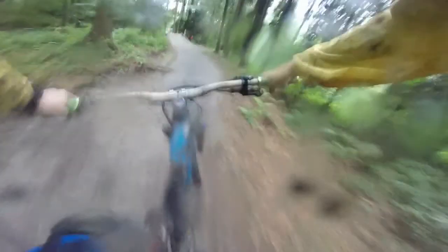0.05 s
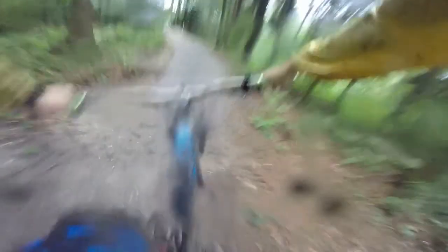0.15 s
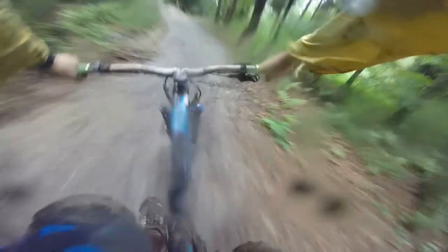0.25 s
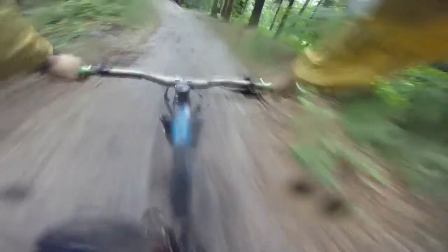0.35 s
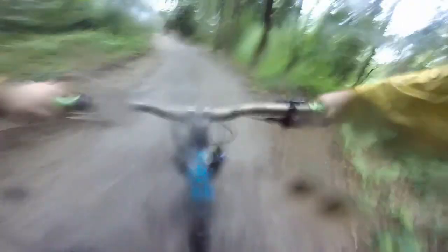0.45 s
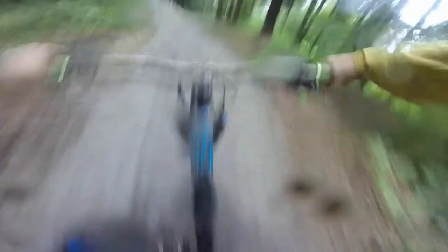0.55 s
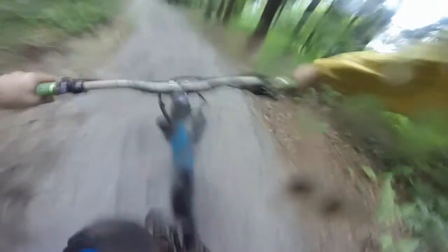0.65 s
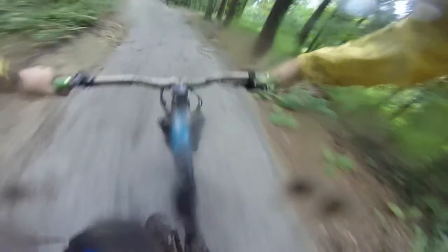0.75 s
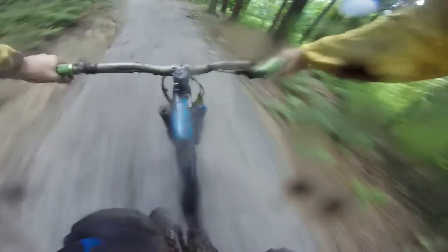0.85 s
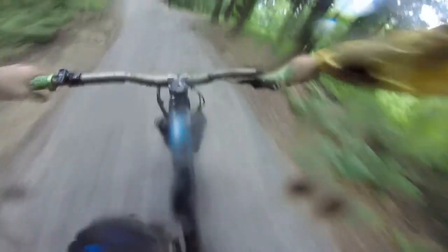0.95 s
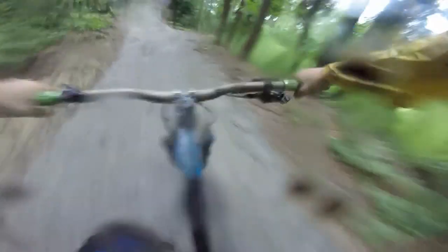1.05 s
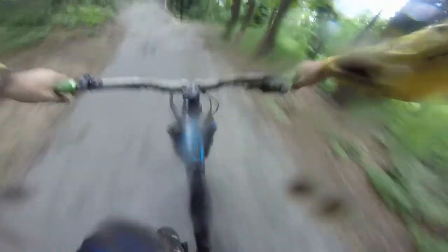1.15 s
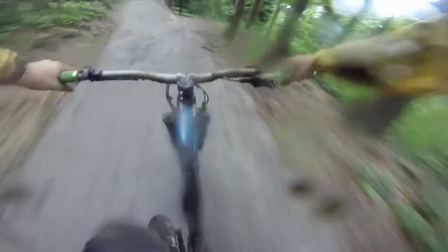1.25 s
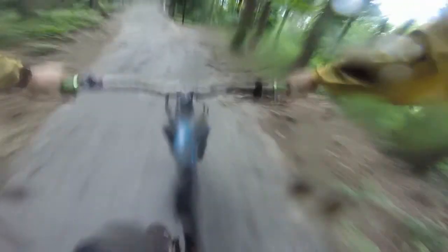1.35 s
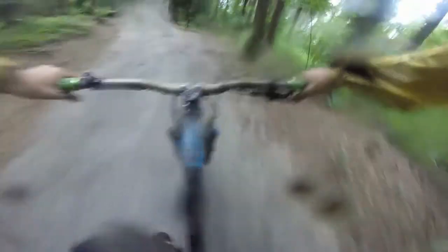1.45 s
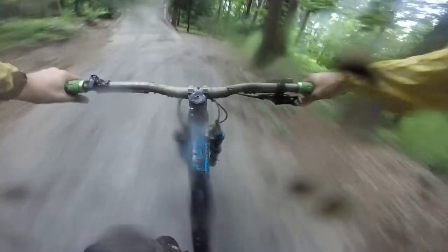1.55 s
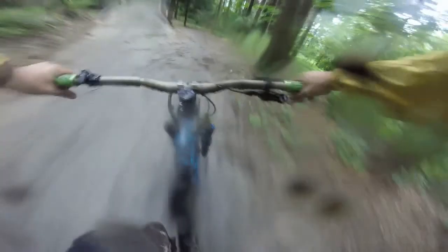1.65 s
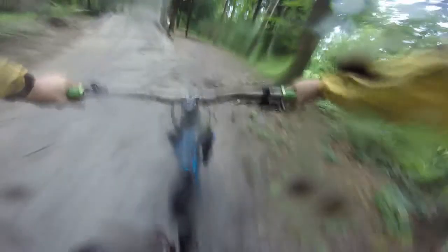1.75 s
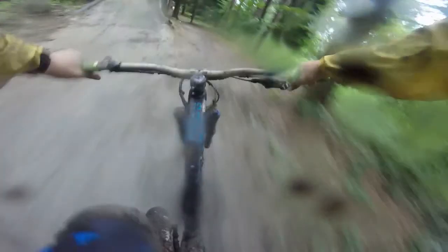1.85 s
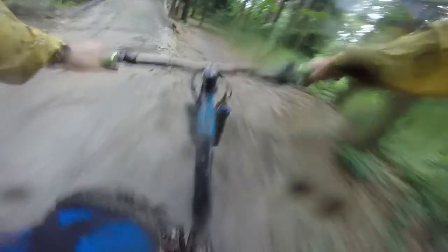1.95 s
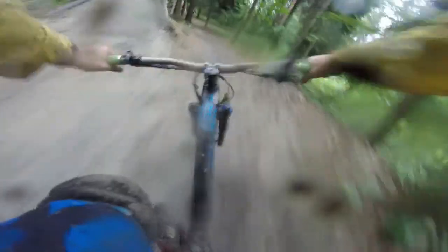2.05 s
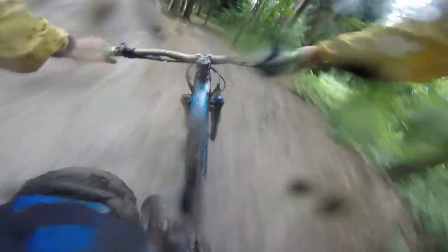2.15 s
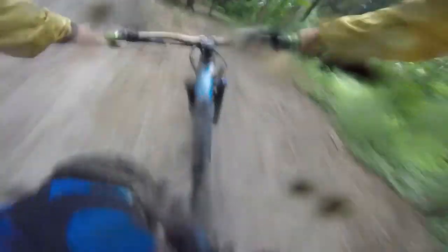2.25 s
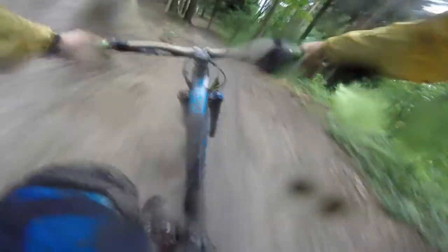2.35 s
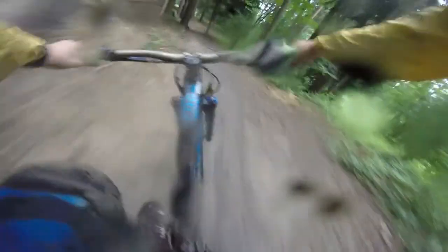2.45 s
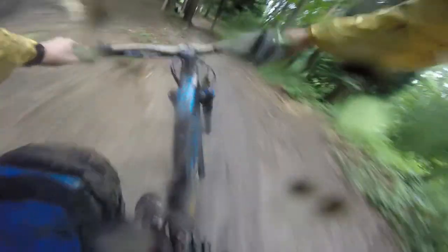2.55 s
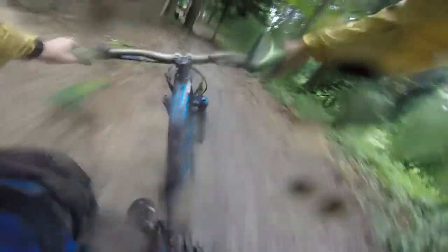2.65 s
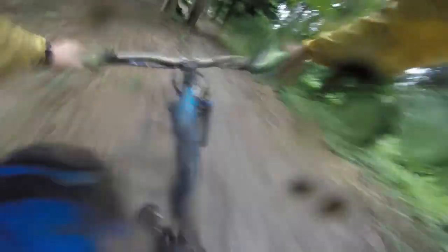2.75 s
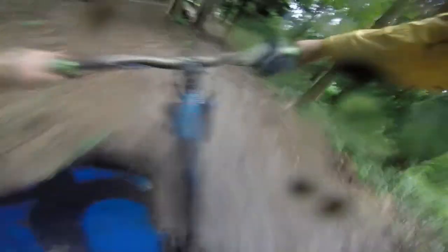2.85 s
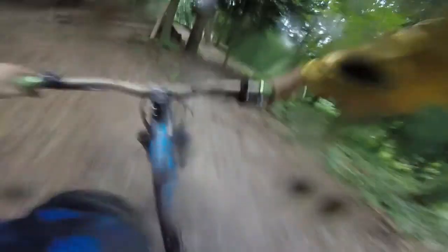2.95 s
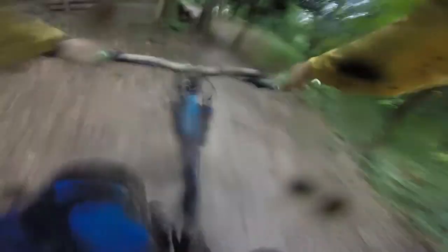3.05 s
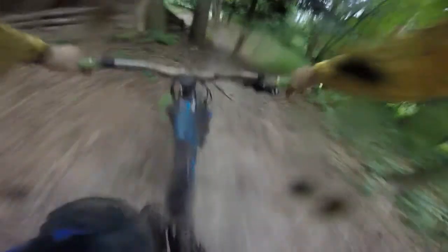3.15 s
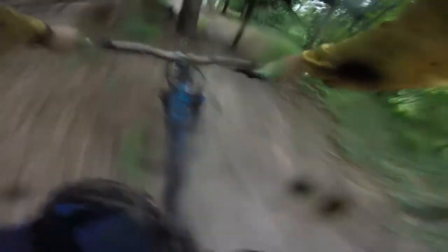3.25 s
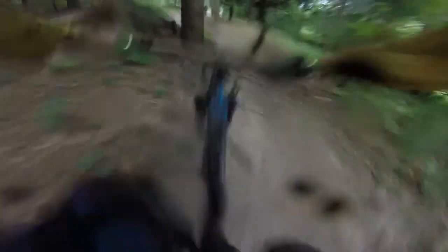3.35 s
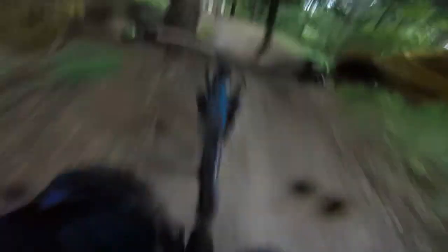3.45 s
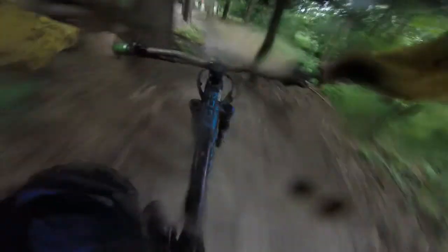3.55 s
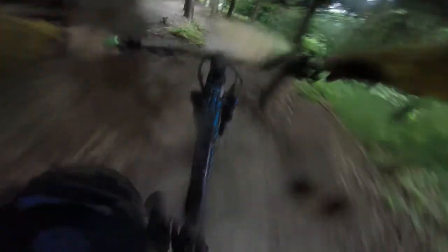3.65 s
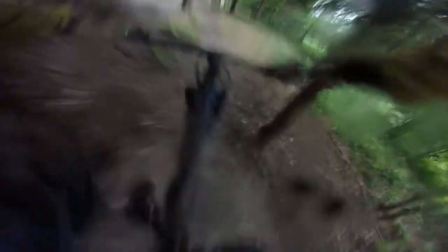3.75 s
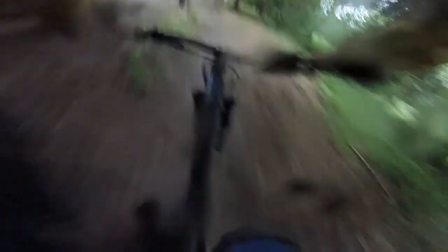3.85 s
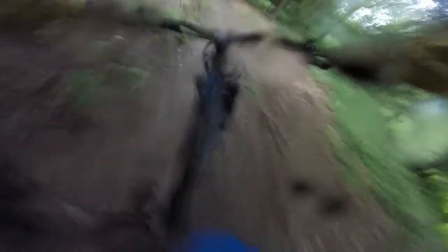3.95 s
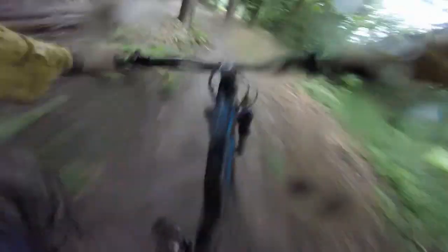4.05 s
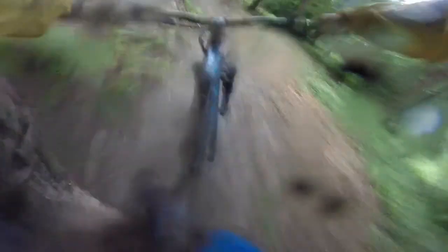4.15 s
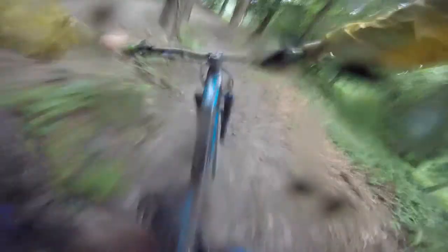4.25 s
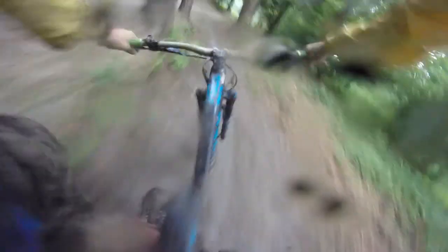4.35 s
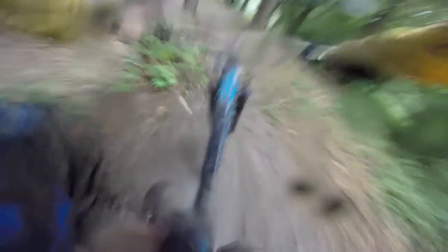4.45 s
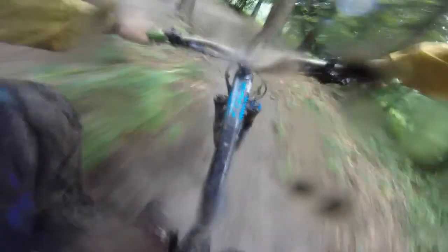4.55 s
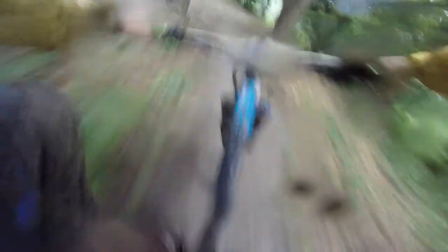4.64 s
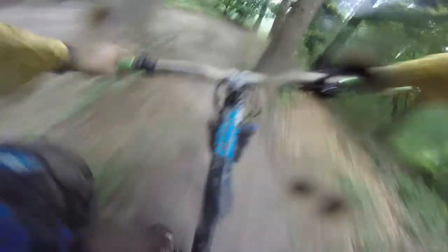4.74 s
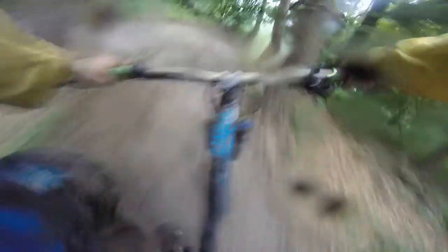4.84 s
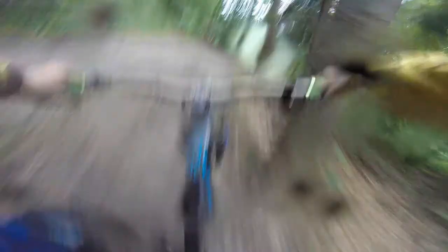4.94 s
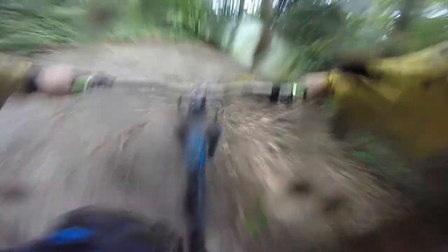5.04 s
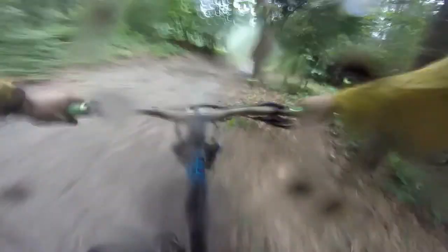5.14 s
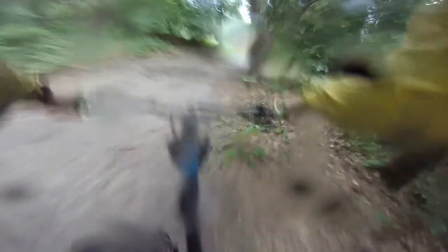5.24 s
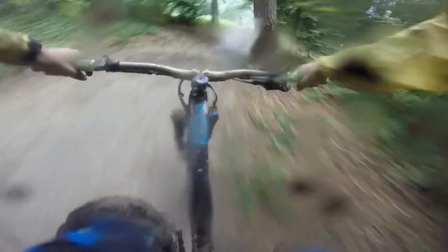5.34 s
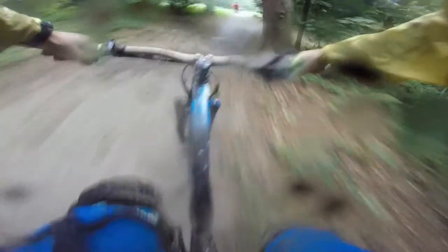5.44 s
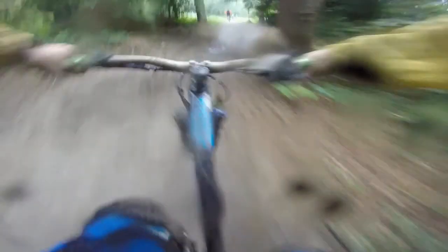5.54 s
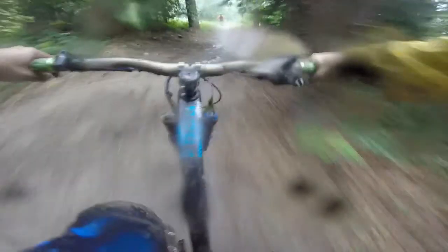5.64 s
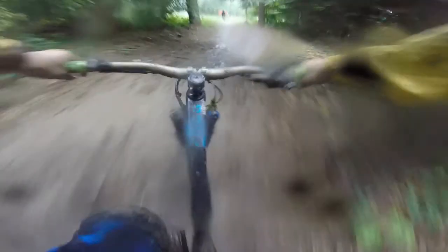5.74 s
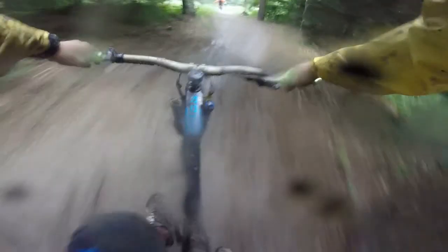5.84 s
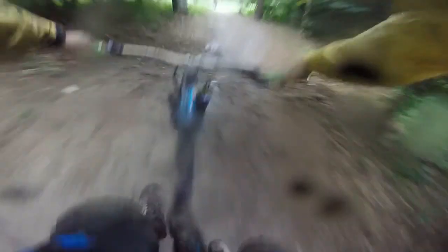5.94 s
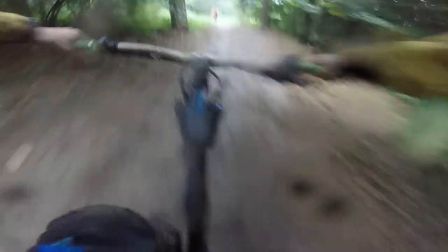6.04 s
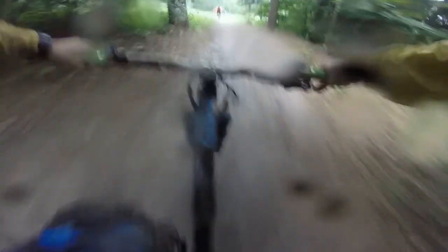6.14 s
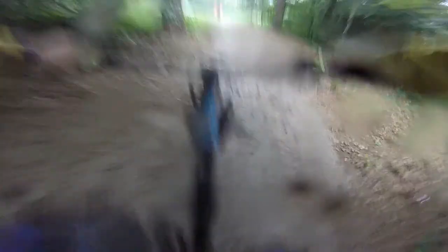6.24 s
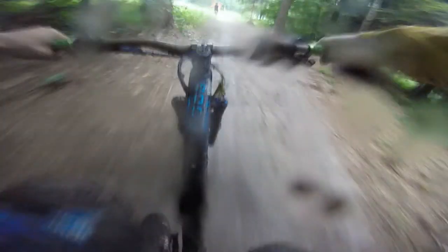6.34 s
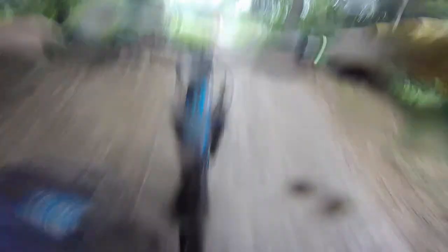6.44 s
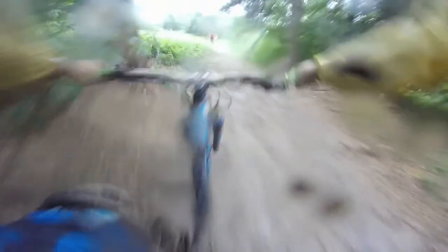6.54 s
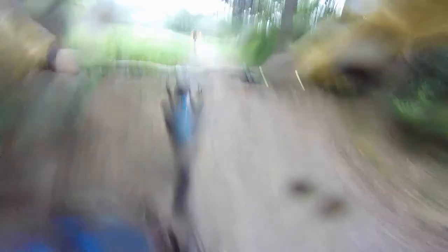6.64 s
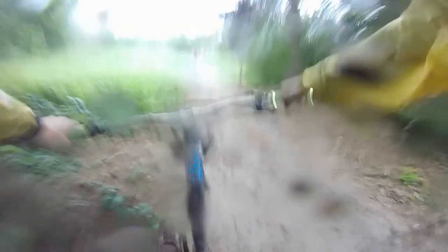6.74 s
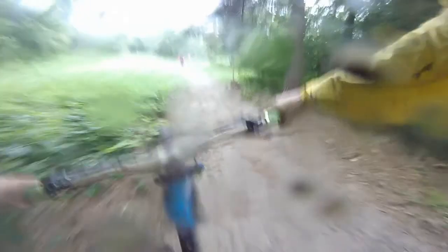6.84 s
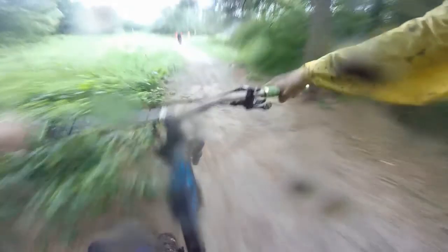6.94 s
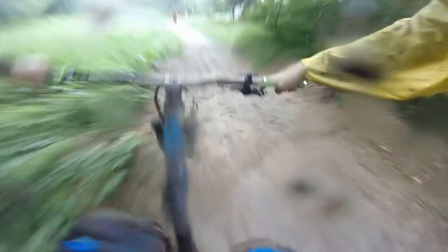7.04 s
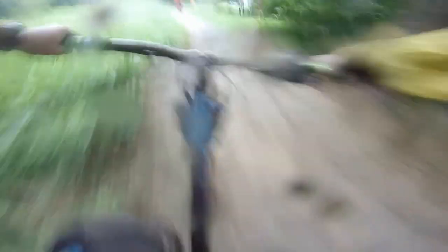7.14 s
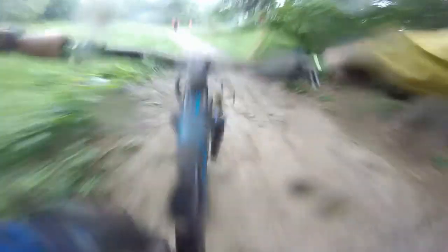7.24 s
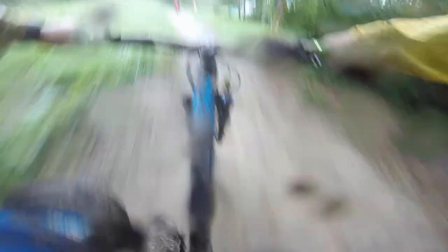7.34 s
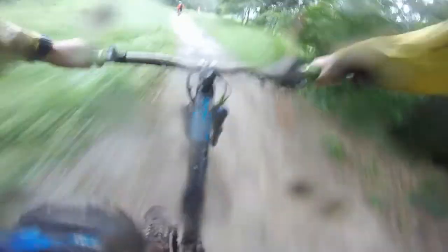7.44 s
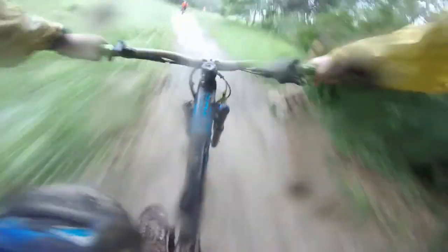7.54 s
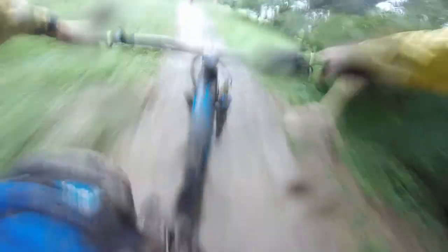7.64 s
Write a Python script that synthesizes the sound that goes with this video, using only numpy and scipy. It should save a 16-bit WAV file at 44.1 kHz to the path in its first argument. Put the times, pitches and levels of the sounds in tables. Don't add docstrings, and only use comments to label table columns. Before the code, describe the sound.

Heard from inside a hard camera case: muffled gravel crunch, clicking loose parts, deep jolting thuds and brief hissing brakes during a fast bike descent.

```python
import sys
import numpy as np
from scipy import signal
from scipy.fft import rfft, irfft
from scipy.io import wavfile
from scipy.ndimage import uniform_filter1d

SR = 44100
rng = np.random.default_rng(int(sys.argv[2]) if len(sys.argv) > 2 else 0)


def invert_db(x):
    u = np.asarray(x, float) / 20
    return 10 ** u


def generate_wav(signal):
    frames = np.transpose(np.atleast_2d(signal))
    scaled = np.clip(frames, -1, 1) * 32767
    pcm = np.round(scaled).astype(np.int16)
    wavfile.write(sys.argv[1], SR, pcm)


N = 339129
TIME = np.arange(N) / SR

# centre in Hz, width in Hz, level in dB.
WALL = [(1170, 355, 2.5), (1537, 237, 3.5), (1970, 190, 5), (2300, 257, 4), (2670, 260, 1),
        (2947, 160, -0.5), (3620, 590, -4.5)]
# centre in Hz, width in Hz, level in dB.
DISC = [(3430, 1200, 13.5), (4970, 1800, -5), (6000, 1270, 10.5), (7570, 1500, 3), (8770, 1530, 9)]


def level(x, db):
    return x * invert_db(db) / np.sqrt(np.mean(x ** 2))


def ring(x, hz, width_hz):
    return signal.lfilter(*signal.iirpeak(hz, hz / width_hz, SR), x)


def body(x, modes):
    return sum((-1) ** k * invert_db(db) * ring(x, hz, width_hz) for k, (hz, width_hz, db) in enumerate(modes))


def walk(rate_hz):
    hold = int(SR / rate_hz)
    steps = np.repeat(rng.standard_normal(N // hold + 1), hold)
    return uniform_filter1d(uniform_filter1d(steps, hold), hold)[:N]


def grains(rate_hz, scatter_db, ms):
    size_db = scatter_db * np.minimum(rng.exponential(size=N), 2.)
    starts = (rng.random(N) < rate_hz / SR) * invert_db(size_db)
    fade = [1, -np.exp(-2000 / (ms * SR))]
    return signal.lfilter([1], np.convolve(fade, fade), starts) * rng.standard_normal(N)


def patchy(x, modes, rate_hz, patchy_db, top_hz):
    mix = np.zeros(N)
    for mode in modes:
        caught = x * rng.choice((-1, 1), N) * invert_db(patchy_db * walk(rate_hz))
        mix += ring(body(caught, [mode]), mode[0], 2 * mode[1])
    return level(signal.lfilter(*signal.butter(3, top_hz, fs=SR), mix), 0)


def add(out, s, x):
    i = max(int(s * SR), 0)
    out[i:i + len(x)] += x[:N - i]


def all_bumps():
    # start in seconds, peak in dB, hard edge in dB, shell in Hz (minus: pushed in first).
    bump_events = [(.001, -18, -25, 201), (.51, -19, -3, 211), (.591, -28, 0.5, 164),
                   (.613, -22, -5.5, 148), (.6845, -14, -5.5, 221), (1.533, -30.5, 0, 196),
                   (2.459, -32.5, 8.5, 168), (2.986, -30.5, -5.5, 166), (3.137, -24, -5, 132),
                   (3.489, -19.5, -48, 150), (3.555, -24.5, -42, 157), (3.975, -20, -7, -205),
                   (4.043, -22, -3.5, 185), (4.163, -20.5, -4, 200), (4.236, -17, -22, -200),
                   (4.383, -19.5, -43, 149), (4.442, -18, -11, 207), (5.235, -29.5, -12, 137),
                   (5.309, -31, -10, 178), (5.612, -24.5, -5.5, 227), (6.358, -30, 1.5, 157),
                   (6.615, -18.5, -10, -198), (6.712, -17.5, -22, 164), (6.755, -20.5, -7.5, 200),
                   (6.838, -17.5, -9.5, 224), (6.973, -32, -25, 203), (7.33, -31.5, -15, 213)]
    # start in seconds, peak in dB.
    roots = [(0.074, -31.5), (.112, -34.5), (1.639, -33), (2.074, -29), (2.225, -31.5), (2.859, -27.5),
             (3.036, -40), (4.59, -26.5), (4.892, -27.5), (5.646, -31.5), (5.702, -39.5), (3.397, -38),
             (6.532, -23), (7.242, -23.5), (7.383, -34)]
    edge_db, shell_hz = -4, 204.4
    return list(bump_events) + [(s, db, edge_db, shell_hz) for s, db in roots]


def shaking():
    # time in seconds, grit level in dB.
    trail = [(0, -43), (.55, -46), (.75, -43.5), (.99, -55.5), (1.22, -46.5), (1.9, -49.5), (2.6, -50.5),
             (3.0, -43.5), (3.65, -44.5), (4.0, -38), (4.75, -46), (5.1, -47.5), (5.95, -51), (6.27, -47),
             (6.45, -49), (6.66, -38), (7.03, -53), (7.45, -44.5)]
    # centre in seconds, hush in dB, width in ms.
    crests = [(.3, 11, 61), (1.4, 4.5, 69), (3.62, 7, 340), (4.13, 6.5, 78), (4.53, 7, 27), (4.88, 0.5, 44),
              (5.3, 9, 20), (5.57, 3.5, 18), (6.332, 8.5, 23), (7.6, 7.5, 65), (2.28, 4, 17),
              (3.11, 3.5, 12), (3.26, 6, 37), (3.745, 8, 6.1), (3.85, 11, 5.6), (4.67, 6, 14),
              (4.86, 6, 10), (5.42, 3, 6.9), (6.746, 24, 8.1), (7.05, 0, 11), (7.63, 1, 12),
              (6.02, 3.5, 11), (6.09, 5, 20)]
    # centre in seconds, surge in dB, width in ms.
    drifts = [(.42, 4.5, 16), (1.181, 3, 36), (2.33, 5, 34), (2.9, -2.5, 57), (3.46, 10.5, 38),
              (4.38, 3.5, 24), (5.81, 3, 21), (6.036, 4.5, 5), (6.16, 5, 11), (6.29, 8, 69), (6.55, 1, 23),
              (7.25, 7.5, 31), (.09, 5.5, 13), (1.25, 2, 22), (1.59, 6.5, 13), (1.77, 2.5, 19),
              (2.1, 1.5, 32), (2.24, 4.5, 53), (2.41, 11.5, 24), (2.51, 6.5, 13), (2.77, 6, 12),
              (2.96, 4, 49), (3.18, 1.5, 16), (3.785, 4, 5.9), (3.83, 6.5, 7.9), (4.01, 3, 20),
              (4.21, 4.5, 51), (4.57, 3.5, 14), (4.64, 3, 16), (4.75, 4, 47), (4.83, 1.5, 23),
              (5.46, 5.5, 20), (5.53, 2, 9.7), (5.7, 5.5, 54), (7.175, 7.5, 42), (0.531, 11.5, 37),
              (.73, 1, 40), (6.638, 3.5, 27), (7.38, 5.5, 11), (7.4, 2, 21)]
    shell_over_grit_db, after_shell_db, after_grit_db, after_s = 6.5, -6.5, -21.5, 0.036

    ground_db = np.interp(TIME, *np.transpose(trail))
    for s, hush_db, ms in list(crests) + [(s, -db, ms) for s, db, ms in drifts]:
        ground_db = ground_db - hush_db * np.exp(-((TIME - s) * 1000 / ms) ** 2)

    t = TIME[:SR // 2]
    tail = np.exp(-t / after_s) * (1 - np.exp(-(t / 0.0006) ** 2))
    after = np.zeros(N)
    for s, db, *_ in all_bumps():
        add(after, s, invert_db(db) * tail)

    def stirred(steady_db, after_db):
        return 20 * np.log10(np.hypot(invert_db(steady_db), invert_db(after_db) * after))

    return stirred(ground_db, after_grit_db), stirred(ground_db + shell_over_grit_db, after_shell_db)


def squeezing():
    # start in seconds, hold in seconds, pad rub in dB, bite in seconds.
    squeezes = [
        (.46, 0.17, -46, 0.0012),
        (.85, 0.29, -67.5, .05),
        (1.71, 0.024, -49.5, 0.011),
        (2.42, 0.31, -48, 0.11),
        (2.8, 0.25, -52, 0.11),
        (3.9, 0.089, -58.5, 0.051),
        (4.4, 0.53, -65.5, 0.23),
        (6.69, 0.011, -47.5, 0.0076),
    ]
    let_go_s, idle_rub_db = 0.018, -65
    rub = invert_db(idle_rub_db)
    for s, held_s, db, bite_s in squeezes:
        before = np.maximum((s - TIME) / bite_s, 0)
        after = np.maximum((TIME - s - held_s) / let_go_s, 0)
        rub = rub + invert_db(db) * np.exp(-before - after)
    return 20 * np.log10(rub)


def brakes(rub_db):
    drag = rng.standard_normal(N) + .6 * level(grains(200, 4, 1.5), 0)
    return invert_db(rub_db) * patchy(drag, DISC, 80, 4, 10500.)


def drone(shell_db):
    shake = rng.standard_normal(N) * invert_db(3.5 * walk(30))
    high = ring(ring(shake, 166.4, 84.0), 170.5, 130.0)
    low = ring(ring(shake, 114.0, 83.0), 138.0, 146.0)
    return invert_db(shell_db) * level(high + invert_db(-2.5) * low, 0)


def tyres(crunch_db):
    grit = rng.standard_normal(N) * invert_db(1.8 * walk(25)) + .9 * level(grains(250, 4, 1.6), 0)
    low_leak = level(ring(grit, 614.0, 290.0), -14.5)
    high_leak = level(ring(ring(grit, 2500.0, 3100.0), 2500.0, 3100.0), -22.0)
    through_wall = patchy(grit, WALL, 90, 2.7, 3810.0) + low_leak + high_leak
    stones = level(grains(80, 4, 1.8), 0)
    spray = patchy(stones + rng.standard_normal(N), DISC, 60, 8.8, 11000.0)
    return invert_db(crunch_db + 1.0) * through_wall + invert_db(0.45 * crunch_db - 41.5) * spray


def light_ticks():
    low_hz, high_hz = (2294, 2660)
    # start in seconds, ring in dB, crack in dB.
    flicks = [(0.149, -20, -21.5), (.272, -26.5, -28), (0.552, -36, -28), (0.636, -21, -23),
              (.67, -32, -29), (0.7679, -25.5, -25), (0.78, -68, -34), (1.5043, -58, -37),
              (1.573, -27, -35), (1.794, -30, -34), (1.942, -32, -38.5), (2.982, -25, -29.5),
              (4.078, -22.5, -74), (4.2582, -20.5, -26.5), (4.681, -69, -31.5), (4.875, -30, -77),
              (5.042, -34, -29.5), (5.112, -49, -36), (5.154, -35, -36), (5.309, -23, -26.5),
              (5.342, -30, -36), (5.502, -30, -27.5), (5.9087, -25, -33), (5.9856, -41, -28),
              (6.195, -49, -37), (6.3565, -27, -26.5), (6.479, -21.5, -25.5), (7.063, -34.5, -42),
              (7.413, -33, -29)]
    # start in seconds, ring in dB, crack in dB.
    scrapes = [(0.0679, -20, -28.5), (0.4705, -35, -29), (0.9636, -45, -30), (1.825, -29, -32),
               (2.136, -65, -34.5), (2.3939, -25.5, -28.5), (2.846, -23, -35), (3.038, -46, -29.5),
               (3.2248, -25, -24.5), (3.269, -51, -36), (3.563, -28, -26), (3.861, -26.5, -35.5),
               (3.9314, -45, -26.5), (3.956, -26, -27.5), (4.097, -38, -29), (4.109, -24, -23.5),
               (4.617, -27.5, -28), (5.2595, -26, -32.5), (5.581, -27, -31.5), (5.973, -29.5, -35),
               (6.122, -31, -24), (6.253, -29.5, -28.5), (6.513, -29, -27), (6.9104, -32, -30.5),
               (7.2174, -30, -27.5), (7.3138, -44, -24.5), (7.469, -32, -30), (7.5742, -27, -29),
               (7.59, -43, -32), (7.6544, -24.5, -28)]
    # start in seconds, ring in dB.
    taps = [(0.191, -30.5), (0.2148, -24), (0.356, -32.5), (0.829, -29), (0.877, -24.5), (1.307, -37.5),
            (1.347, -25), (2.462, -34), (2.8064, -21), (2.88, -25.5), (3.321, -27), (3.892, -26),
            (4.297, -32), (4.988, -24), (5.198, -27), (5.3974, -32), (5.4422, -23), (5.992, -31),
            (6.001, -32), (7.2316, -28), (7.4365, -28), (7.606, -28.5)]
    # start in seconds, crack in dB.
    snaps = [(0.279, -29.5), (0.35, -37), (1.647, -36), (1.992, -27), (2.3477, -19.5), (2.36, -28),
             (2.783, -25), (3.0495, -19.5), (3.146, -23.5), (3.3742, -29), (3.905, -24), (3.9481, -25),
             (4.58, -27), (4.822, -28.5), (5.1727, -50), (6.115, -27), (6.2066, -25), (6.389, -25),
             (6.419, -24), (6.772, -26), (7.153, -33.5), (7.527, -26), (7.5663, -31), (7.651, -31)]
    # start in seconds, peak in dB.
    pebbles = [(0.502, -25), (0.792, -41), (0.8398, -29.5), (0.854, -39), (0.864, -29), (0.895, -36),
               (1.051, -37.5), (2.5302, -33), (2.944, -39), (2.9756, -31), (3.02, -30), (3.06, -35),
               (4.2357, -32), (4.4862, -25.5), (4.7463, -31.5), (4.9302, -36), (5.023, -54), (5.123, -34),
               (5.135, -42), (5.328, -28.5), (5.382, -29.5), (5.4887, -33), (6.3838, -27), (6.602, -32),
               (6.9807, -39), (7.1896, -32.5), (.934, -34.5), (7.6624, -35)]
    flick_ms, scrape_ms, tap_ms, snap_ms, pebble_ms = 2.86, 6.64, 3.28, 2.83, 2.46

    ticks = [(*flick, flick_ms, low_hz) for flick in flicks]
    ticks += [(*scrape, scrape_ms, high_hz) for scrape in scrapes]
    ticks += [(s, db, db - 2, tap_ms, low_hz) for s, db in taps]
    ticks += [(s, db - 3, db, snap_ms, high_hz) for s, db in snaps]
    ticks += [(s, db - 0.5, db - 2, pebble_ms, high_hz) for s, db in pebbles]
    return ticks


def rattles():
    # frequency in Hz, density in dB per Hz.
    crack_curve = [(500, -5), (1500, 7), (3000, 10), (5000, 4.5), (7000, 2.5), (9000, -1), (11000, -14),
                   (14000, -33), (16000, -52)]
    # start in seconds, ring in dB, crack in dB, contact in ms, ring in Hz.
    knocks = [(.007, -13.5, -15.5, 1.7, 2160), (.0354, -12.5, -31, 1.9, 1970),
              (.511, -17.5, -28, 1.04, 1920), (.6854, -5.5, -23, 1.64, 2053),
              (1.4462, -20.5, -26.5, 4.8, 2300), (2.8321, -17.5, -28, 1, 1880),
              (3.055, -17, -49, 1.8, 2540), (3.0858, -16.5, -26, 2, 2450), (3.0935, -14.5, -26, 1.5, 1680),
              (3.5115, -18, -24, 2, 2150), (4.0543, -17.5, -26, 2.8, 2660), (4.1675, -23.5, -32, 4.3, 2240),
              (4.278, -18.5, -52, 1.4, 1760), (4.3187, -15, -18, 1.5, 1820),
              (4.394, -14, -16.5, 2.25, 2295), (4.4294, -16, -45, 1.7, 2030),
              (4.4454, -6.5, -28, 3.1, 2597), (4.5102, -29, -27, 5.6, 2300),
              (4.9622, -3, -12.5, 1.83, 2884), (6.366, -15.5, -17.5, 1.12, 2200),
              (6.7162, -16.5, -15.5, 2.7, 2120), (6.7566, -7.5, -25, 2.8, 2000),
              (6.8405, -15.5, -18.5, 3.5, 2300), (6.8993, -19.5, -24, 2.7, 2540)]
    out, t = np.zeros(N), TIME[:2048]
    hz = np.fft.rfftfreq(len(t), 1 / SR) + 1
    curve_hz, curve_db = np.transpose(crack_curve)
    colour = invert_db(np.interp(np.log(hz), np.log(curve_hz), curve_db))
    hits = list(knocks) + light_ticks()
    noises = rng.standard_normal((len(hits), 3, len(t)))
    for (s, ring_db, crack_db, ms, tone_hz), noise in zip(hits, noises):
        u = t / (ms / 1000)
        push = (1 - np.exp(-(u / 0.56) ** 2)) * np.exp(-(u / 0.74) ** 0.95)
        chatter = invert_db(7.7 * level(uniform_filter1d(noise[2], size=40), 0))
        tilt = (hz / 6000) ** (.35 * noise[2, 0])
        burst = (1 - np.exp(-(u / 0.69) ** 2)) * np.exp(-(u / 0.96) ** 1.39)
        burst = burst + 0.027 * np.exp(-t / 0.0057) * u / (1 + u)
        crack = irfft(rfft(noise[0]) * colour * tilt) * chatter * burst
        crack = crack * invert_db(crack_db + 4.5) * np.sqrt(np.sum(burst ** 2) / np.sum(crack ** 2))
        rough = level(ring(body(noise[1] * push, WALL), tone_hz, 1650.0), 0)
        clean = level(ring(np.sin(2 * np.pi * tone_hz * t) * push, tone_hz, 800.0), 0)
        roughness = .6 if ring_db > -15 else 1.3
        tone = clean + roughness * rough
        add(out, s - .0003, crack + tone * invert_db(ring_db + 0.5) / np.abs(tone).max())
    return out


def raps():
    # start in seconds, peak in dB, mode in Hz, swell in ms.
    buckle = [(0.0348, -27, 940, 1.3), (.14, -31, 1040, 0.72), (.268, -30, 400, 0.98),
              (0.508, -49, 437, 1.7), (0.6062, -21, 1290, 1.1), (.605, -24.5, 730, 1.6),
              (.686, -16, 450, 3), (2.35, -22, 407, 0.39), (2.462, -26, 1170, 1.8), (3.136, -33, 1460, 2),
              (3.454, -33.5, 1170, 2.3), (3.51, -19, 1380, 0.56), (3.509, -25.5, 382, 2.6),
              (4.08, -27, 1220, 0.99), (4.263, -24, 1360, 1.1), (4.393, -26.5, 644, 1.3),
              (4.4302, -26, 1150, 1.2), (4.429, -25, 332, 1.3), (4.442, -22, 1130, 0.77),
              (4.4471, -7, 1390, 0.62), (4.618, -43, 635, 1.5), (4.9616, -10.5, 666, 0.33),
              (4.984, -26.5, 1250, 1.1), (5.308, -28, 880, 1.2), (6.0532, -14, 1180, 0.58),
              (6.053, -17.5, 450, 1.07), (6.184, -39, 1140, 1.5), (6.418, -26, 400, 0.69),
              (6.715, -26, 1030, 1.5), (6.827, -33, 416, 2.2), (6.834, -29, 1260, 1.8),
              (7.526, -31, 378, 1), (.138, -21.5, 185, 0.95), (1.178, -37, 1250, 2.3),
              (1.202, -38, 1273, 1.5), (1.545, -36, 220, 2.7), (1.601, -32, 1180, 1.1),
              (1.666, -42, 1200, 2), (2.38, -37, 250, 4.5), (2.594, -29.5, 229, 3.8),
              (2.861, -34, 268, 5.9), (3.037, -27, 220, 2.8), (3.126, -25.5, 200, 2.9),
              (4.004, -19.5, 205, 7.4), (5.055, -28, 148, 3.5), (5.174, -41, 1190, 1.3),
              (5.601, -25, 202, 6.2), (6.186, -27.5, 200, 3.6), (6.218, -34, 1010, 0.83),
              (5.739, -33, 214, 4), (6.627, -17, 198, 3.5)]
    # start in seconds, peak in dB, mode in Hz.
    pings = [(.46, -31, 2980), (.478, -30, 2680), (1.583, -32, 2070), (1.598, -34, 2210),
             (2.748, -35, 2690), (3.225, -34, 2310), (3.272, -37, 2910), (3.716, -33, 2900),
             (3.726, -30.5, 2660), (4.507, -18.5, 2250), (4.769, -37, 2000), (4.782, -30, 2530),
             (4.93, -44, 2980), (4.9315, -43, 3800), (5.127, -40, 2430), (5.236, -39, 1990),
             (5.932, -45, 2980), (6.0535, -40, 3570), (6.127, -32, 4000), (6.194, -37, 3020),
             (6.22, -36, 2300), (6.44, -43, 3500), (7.319, -27, 3200), (7.471, -32, 2700),
             (7.657, -28, 2270), (7.661, -35, 4030), (0.875, -29, 2670)]
    ping_ms = 1.44
    out, t = np.zeros(N), TIME[:2048]
    for s, db, hz, ms in list(buckle) + [(*ping, ping_ms) for ping in pings]:
        u = t / (ms / 1000)
        add(out, s, invert_db(db) * np.e * u * np.exp(-u) * np.sin(2 * np.pi * hz * t))
    return out


def bumps():
    # start in seconds, peak in dB, hard edge in dB, shell in Hz.
    slams = [
        (4.96, -7, -19, 214),
        (6.0525, -19, -23, 232),
    ]
    slam_fade_s, bump_fade_s = .0035, .008
    out, t = np.zeros(N), TIME[:4096]
    blows = [(*slam, slam_fade_s) for slam in slams] + [(*bump, bump_fade_s) for bump in all_bumps()]
    noises = rng.standard_normal((len(blows), len(t)))
    for (s, db, edge_db, hz, fade_s), noise in zip(blows, noises):
        hard = 1 / (1 + invert_db(-edge_db - 20))
        rise_s = 0.00048 + 0.0016 * (1 - hard)
        strap_hz = 325 * (1 + 0.31 * noise[2])
        edge_hz = 1160 * (1 + 0.11 * noise[1])
        shell = np.sin(2 * np.pi * hz * t) * np.exp(-t / fade_s) * (1 - np.exp(-t / rise_s))
        over = np.sin(2 * np.pi * 462 * t) * np.exp(-t / (0.48 * fade_s))
        slap = level(ring(noise, 630.0, 740.0), 0) * np.exp(-t / 0.00049)
        strap = np.sin(2 * np.pi * strap_hz * t) * np.exp(-t / 0.0045)
        edge = np.sin(2 * np.pi * edge_hz * t) * np.exp(-t / 0.0023) * (1 - np.exp(-t / 0.00031))
        crunch = level(body(noise, WALL), 0) * np.exp(-t / (1.24 * fade_s)) * (1 - np.exp(-t / 0.00087))
        soft = invert_db(9.0) * shell + invert_db(2.3 * db + 27) * hard * over
        soft = soft + invert_db(.5 * edge_db - 1.5) * slap + invert_db(3.5) * hard * strap
        blow = soft + invert_db(edge_db + 9.5) * edge + invert_db(edge_db - 2.5) * crunch
        add(out, s + 0.00193, -invert_db(db) * blow)
    return signal.lfilter(*signal.butter(4, 4200., fs=SR), out)


def lurches(shell_db):
    # time in seconds, depth in dB, width in ms, swell before it 0-1.
    drops = [(0.016, -7.5, 13.9, 1), (2.358, -11.5, 24.6, 0.55), (2.815, -14.5, 19, 0.4),
             (2.997, -14, 23, .02), (3.151, -13, 13.3, 0.9), (3.518, -12, 10.6, 0.87),
             (3.925, -22, 11, 0.3), (4.06, -7.5, 14, 1), (4.268, -5, 13.3, 0.34), (4.408, -4, 9.3, 0.28),
             (4.494, -10.5, 28, 0), (4.576, -15, 71, 0.5), (4.662, -13.5, 18, 0), (4.994, -12, 10, 0.9),
             (6.372, -10.5, 18.5, 0.9), (6.487, -16, 34, 0), (6.638, -16, 10, .02), (6.7304, -2, 7.3, 0.18),
             (6.852, -11, 2.9, 0.1), (7.216, -19.5, 8.5, 0.4), (7.413, -15, 22, 0.5)]
    # time in seconds, depth in dB.
    dips = [(.16, -14.5), (0.278, -22), (0.636, -10), (1.227, -19.5), (1.61, -19), (2.137, -20),
            (5.202, -21.5), (2.519, -19), (2.641, -20.5), (2.702, -18.5), (2.906, -18), (3.728, -20),
            (4.837, -18), (6.225, -20.5), (7.528, -20), (1.09, -34), (1.8, -24), (1.909, -22.5), (2.2, -20),
            (2.424, -19.5), (3.199, -21.5), (3.335, -21), (3.653, -23.5), (4.149, -23), (4.714, -16.5),
            (5.256, -23), (5.39, -29.5), (5.71, -27)]
    # centre in seconds, pressure in dB, width in ms.
    heaves = [
        (3.9, -17, 7.7),
        (6.7165, 0, 8.6),
        (3.2, -21, 12),
        (4.049, -13, 1.2),
    ]
    dip_ms, dip_swell = 22, 0.15
    out = np.zeros(N)
    for s, db, ms, swell in list(drops) + [(*dip, dip_ms, dip_swell) for dip in dips]:
        start = max(s - .15, 0)
        u = (TIME[:SR // 3] + start - s) / (0.673 * ms / 1000) + 1
        after = np.maximum(u, 0)
        build = swell * np.exp(-np.abs(u) / np.where(u < 0, .8, .2))
        collapse = after ** 1.49 * np.exp(1 - after ** 1.33)
        add(out, start, invert_db(db) * (build - collapse))
    for s, db, ms in heaves:
        out += invert_db(db) * np.exp(-((TIME - s) * 1000 / ms) ** 2)
    out = signal.lfilter(*signal.butter(1, (5., 220.), "band", fs=SR), out)
    sway = ring(ring(rng.standard_normal(N), 15.0, 11.6), 19.5, 57.0)
    return out + level(sway, -35.5) * invert_db(0.61 * (shell_db - shell_db.mean()))


def scene():
    crunch_db, shell_db = shaking()
    ground = brakes(squeezing()) + drone(shell_db) + tyres(crunch_db)
    case = rattles() + raps() + bumps() + lurches(shell_db)
    return (ground + case)[None]


def top_cut(x):
    return signal.sosfilt(signal.butter(12, 16540, fs=SR, output="sos"), x)


def record(dry):
    hiss = level(ring(rng.standard_normal(N), 6000., 12000.), -79)
    soft = np.tanh(0.66 * dry) / 0.74 + hiss
    mix = signal.sosfilt(signal.cheby1(9, 1, 15200., fs=SR, output="sos"), soft)
    return top_cut(mix)


dry = scene()
out = record(dry)
generate_wav(out)
```